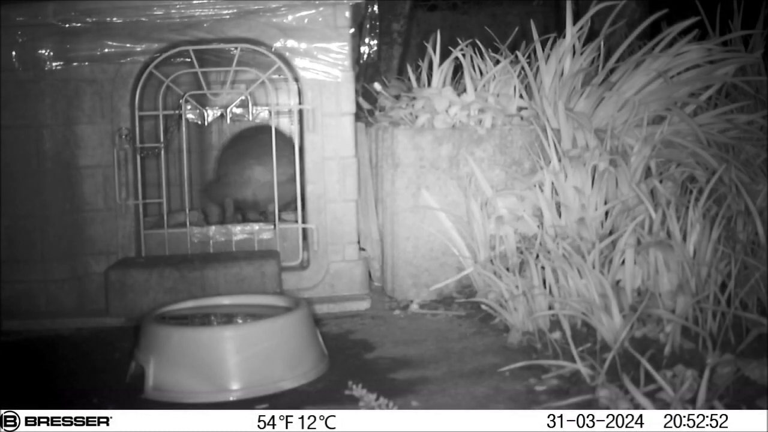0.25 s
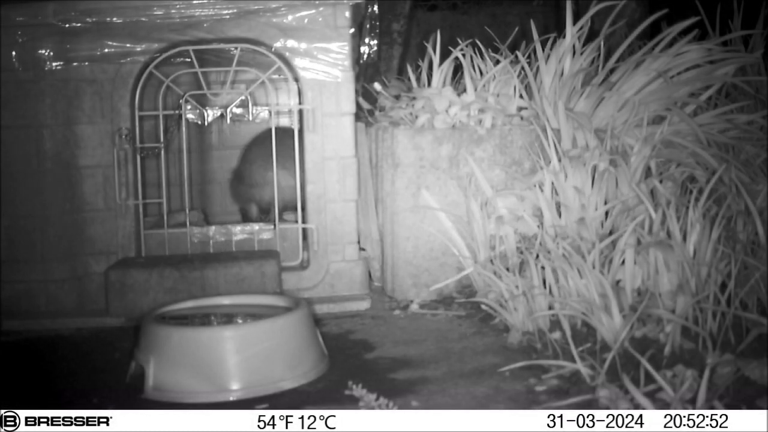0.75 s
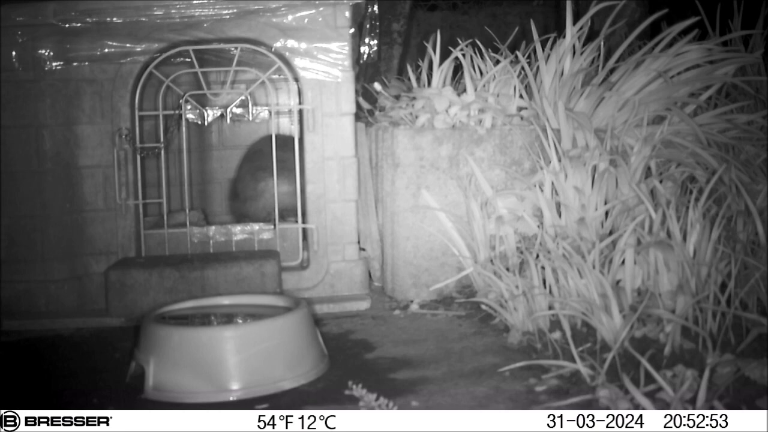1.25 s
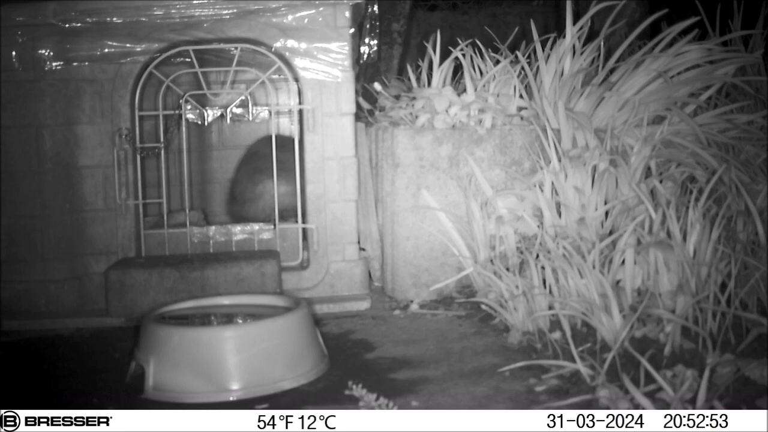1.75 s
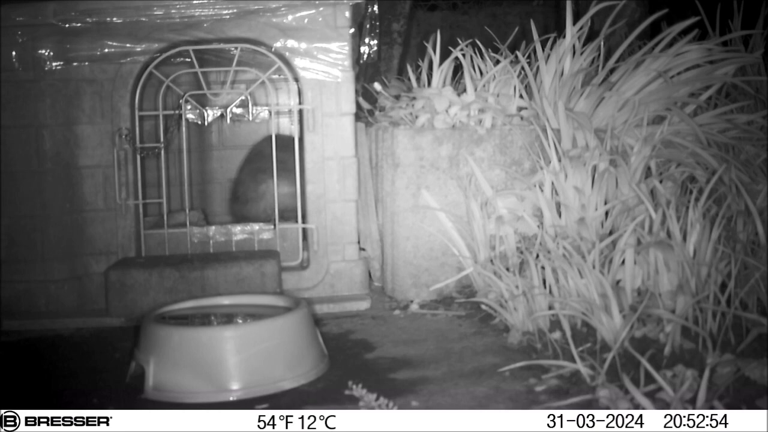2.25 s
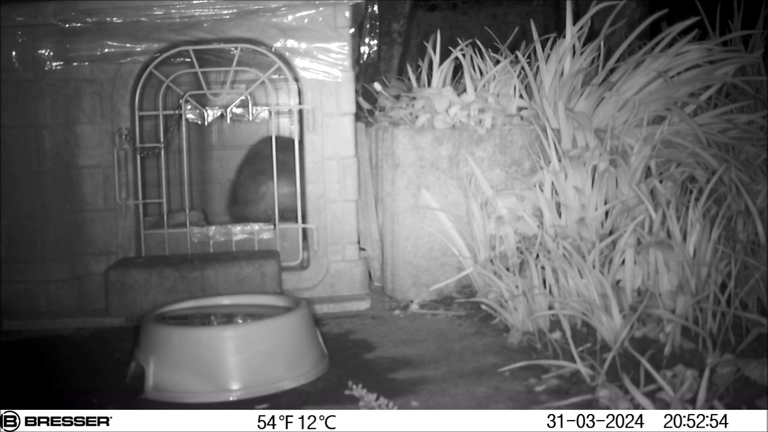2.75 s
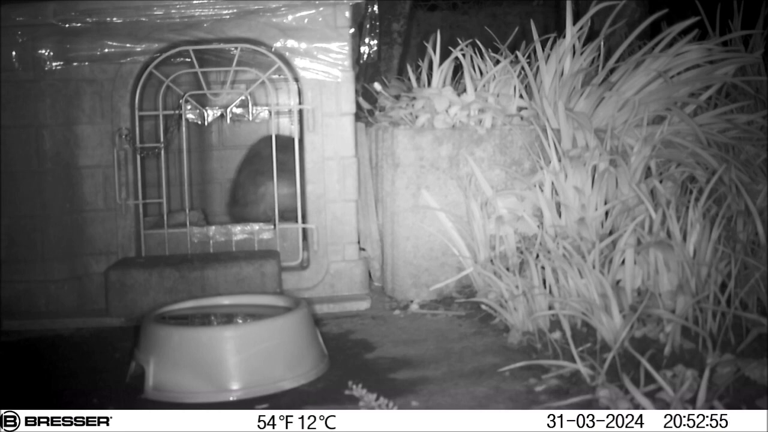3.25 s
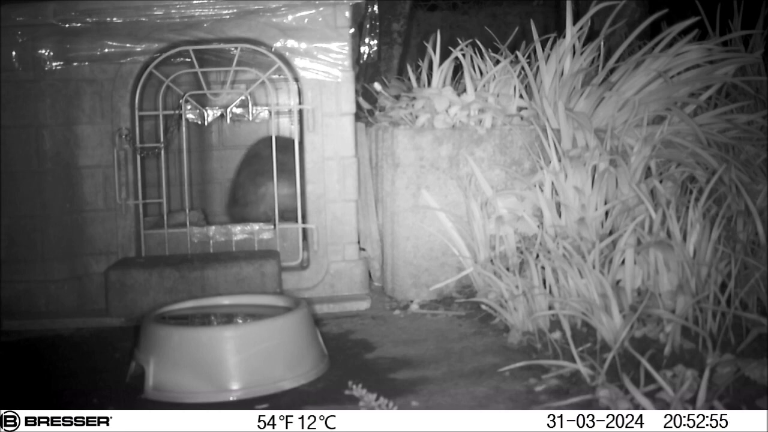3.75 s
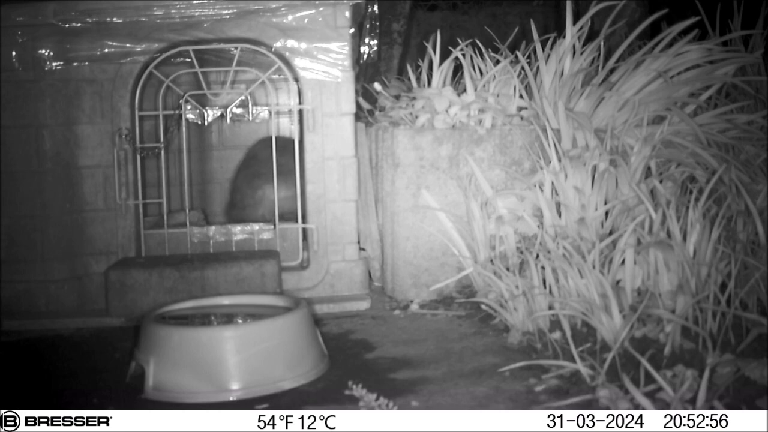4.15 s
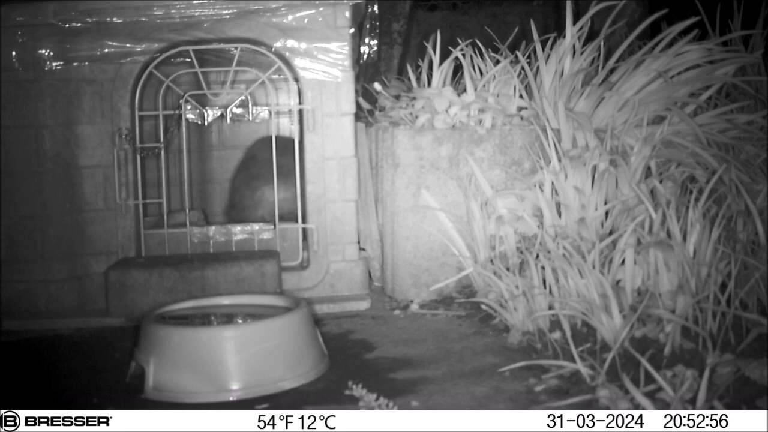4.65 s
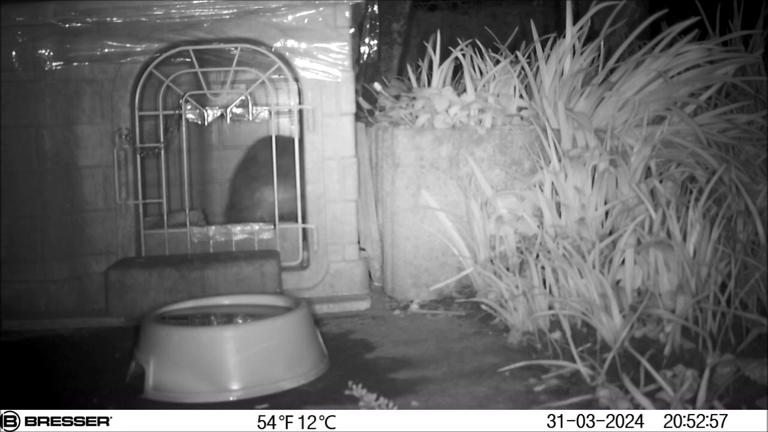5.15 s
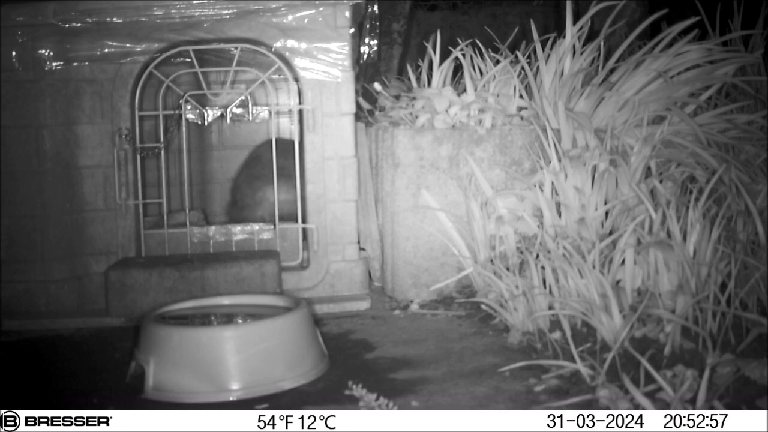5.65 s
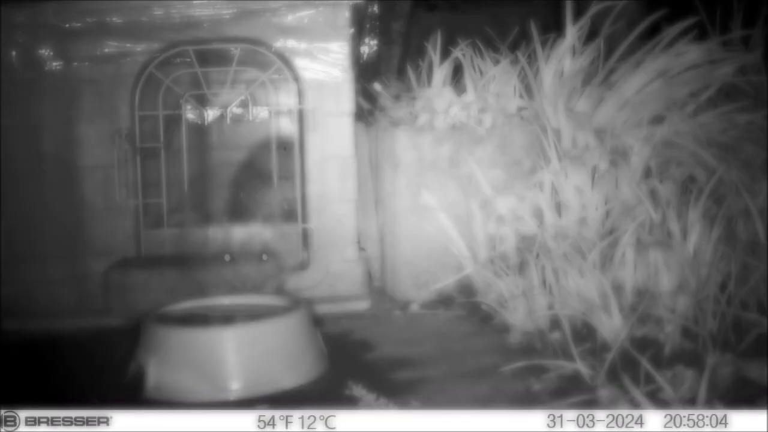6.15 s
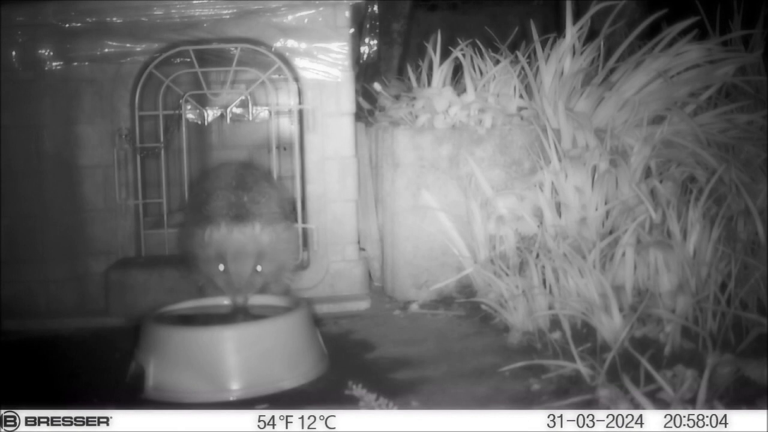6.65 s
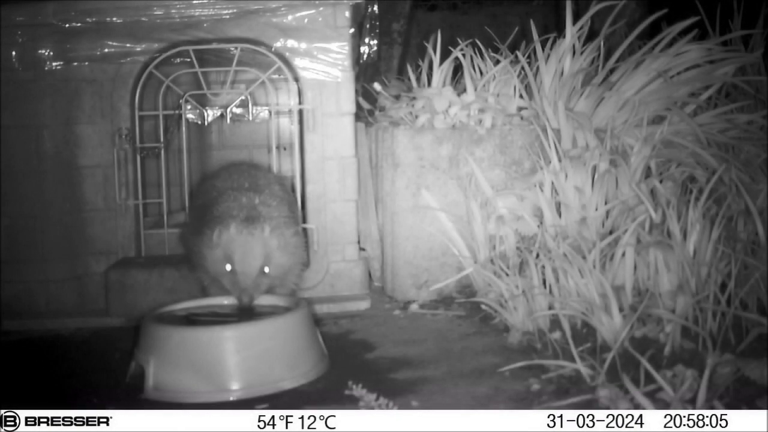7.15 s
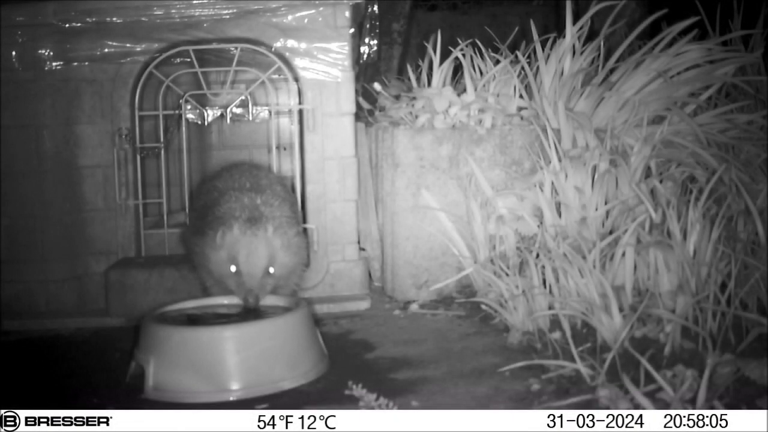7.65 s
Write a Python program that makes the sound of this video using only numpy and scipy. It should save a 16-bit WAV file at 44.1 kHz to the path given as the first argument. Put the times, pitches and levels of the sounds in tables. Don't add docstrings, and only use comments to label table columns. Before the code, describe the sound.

Small-animal chewing at night: brittle crunches and tiny ticks, later wet tongue smacks and two loud cracks on a bowl, above distant traffic rumble.

```python
import sys
import numpy as np
from scipy import signal
from scipy.fft import rfft, irfft
from scipy.io import wavfile

SR = 44100
rng = np.random.default_rng(int(sys.argv[2]) if len(sys.argv) > 2 else 0)


def dump_mix(stems):
    frames = np.atleast_2d(stems).T
    limited = np.clip(frames, -1, 1)
    pcm = np.round(limited * 32767).astype(np.int16)
    wavfile.write(sys.argv[1], SR, pcm)


def gain_from_decibels(decibels):
    exponent = np.asarray(decibels, float) / 20
    return 10 ** exponent


N = 348390

# (frequency [Hz], width [Hz], level [dB])
CAVITY_MODES = [(1665, 220, 3), (2170, 290, 1.5), (2710, 310, -0.5), (3160, 240, -3.5), (3257, 66, -3.5),
                (3500, 360, 1), (3950, 310, -2), (4200, 190, -2.5), (4620, 290, 2), (4785, 150, -3),
                (5100, 150, -4.5), (5230, 380, -5), (5650, 470, 2.5), (6240, 87, -3.5), (7230, 970, 1.5)]
# (low edge [Hz], high edge [Hz])
SPLINTER_BAND = (6340, 11800)


def chewing():
    s, rise_ms, fall_ms, *power = mouth()
    strength = swells(s, np.array(power), np.maximum(rise_ms, 0.2), np.maximum(fall_ms, 0.5))
    splinter_strength = strength[-1]

    splinters = splinter_strength * fractures(per_s=6300, uneven_db=0)
    splinters = gain_from_decibels(3.5) * filtered(splinters, 2, SPLINTER_BAND, "band")
    splinters = filtered(splinters, 2, 12500)

    sudden = np.zeros(N)
    sudden[np.round(s * SR).astype(int)] = rise_ms < 1.5
    body = ringing(strength, CAVITY_MODES, per_s=2200, uneven_db=5, blows=gain_from_decibels(20) * sudden)
    body = filtered(body, 3, 7500)

    total_strength = np.sqrt((strength ** 2).sum(axis=0))
    clicks = sudden * (gain_from_decibels(7.5) * total_strength + gain_from_decibels(26) * splinter_strength)
    return body + splinters + filtered(clicks, 3, [2500, 10500], "band")


def mouth():
    return np.hstack([snaps(), grinds(), ticks(), rustles(), smacks(), cracks()])


# (time [s], peak level [dB], fall [ms per 10 dB], mouth centre [Hz])
SNAP_BITES = [(1.8089, -61.5, 17, 4350), (2.0113, -53.5, 25, 5630), (2.4135, -61, 30, 5510),
              (2.4484, -44, 15, 5100), (2.4868, -54.5, 6, 4620), (2.665, -43.5, 20, 5540),
              (2.9728, -52, 6, 5700), (2.9955, -51.5, 9.5, 3880), (3.204, -47.5, 14, 5600),
              (3.4233, -54, 13, 5300), (3.452, -46.5, 10.5, 3500), (3.6119, -56.5, 9.3, 5730),
              (3.9673, -50.5, 12, 3520), (4.3533, -55, 23, 5540), (4.3984, -50.5, 20, 3480),
              (4.4164, -55, 27, 4680), (4.8735, -47, 12, 5300), (4.872, -53, 8, 3500),
              (4.8894, -49.5, 18, 4620), (5.0986, -56, 15, 4400), (5.358, -52.5, 9, 4670),
              (5.9072, -53, 13, 3300), (5.9657, -56, 10, 5590), (6.1935, -57.5, 14, 3200),
              (6.4136, -52.5, 21, 5600), (6.9959, -56, 28, 4320), (7.3473, -57, 10, 5100),
              (7.5247, -63.5, 34, 4500), (7.7446, -62, 15, 4390)]


def snaps():
    rise_ms, fall_ms = 5.1, column(SNAP_BITES, 2)
    return swarms_of(SNAP_BITES, rise_ms, fall_ms, muffled(SNAP_BITES, -9.5), broad_db=0.5, home_hz=4600)


# (time of the peak [s], peak level [dB], rise [ms per 10 dB], mouth centre [Hz])
GRIND_BITES = [(1.2356, -67, 18, 4570), (1.463, -57, 14, 5200), (1.8386, -56, 10, 4600),
               (2.0577, -57.5, 8, 3800), (2.6454, -62, 22, 4840), (2.6877, -52.5, 8, 3680),
               (3.1907, -60.5, 20, 5730), (3.6496, -46, 15.5, 5350), (3.9195, -61, 12, 5030),
               (4.1873, -63, 16, 5680), (4.2699, -63.5, 22, 5720), (4.3759, -54, 12, 4220),
               (4.6674, -54.5, 33, 3500), (4.845, -58, 8, 5300), (5.1173, -49.5, 22, 4540),
               (5.2471, -67.5, 62, 4380), (5.6281, -58, 24, 4400), (6.0028, -60.5, 58, 4710),
               (6.0458, -62, 20, 6060), (6.3915, -56.5, 12.5, 5750), (6.5595, -67, 15, 3610),
               (6.8491, -57, 12, 5700), (6.8889, -51.5, 13, 4000), (7.098, -50, 14, 5030),
               (7.1926, -63, 13, 3340), (7.2237, -60.5, 15, 4690), (7.3266, -59.5, 45, 3650),
               (7.5612, -67, 25, 3950)]


def grinds():
    rise_ms, fall_ms = column(GRIND_BITES, 2), 13.7
    return swarms_of(GRIND_BITES, rise_ms, fall_ms, muffled(GRIND_BITES, -10), broad_db=0, home_hz=4500)


# (time [s], peak level [dB], mouth centre [Hz])
CRUMB_TICKS = [(0.0783, -61, 3120), (1.2026, -70, 4590), (1.2434, -67, 4630), (1.7321, -62.5, 4690),
               (1.7603, -66, 4220), (2.2337, -69, 4860), (2.5845, -67, 3990), (3.154, -63, 4840),
               (3.9448, -65, 4640), (4.2162, -60, 3230), (4.224, -66, 5630), (5.0801, -57, 4900),
               (5.5509, -66, 4350), (5.5998, -66, 4620), (5.7333, -67, 4380), (5.894, -61, 4360),
               (6.2363, -64, 3390), (6.3761, -55, 5660), (6.4718, -65, 5680), (6.5246, -61, 5810),
               (6.7263, -61, 4650), (6.7729, -58, 3260), (7.1252, -63, 4890), (7.213, -65, 4770),
               (7.3596, -64, 4540), (7.4028, -68, 3990), (7.5991, -64, 4720), (7.7336, -60, 4410),
               (7.7698, -62, 3160), (7.8005, -64, 4610)]


def ticks():
    rise_ms, fall_ms = 4.5, 6.7
    return swarms_of(CRUMB_TICKS, rise_ms, fall_ms, muffled(CRUMB_TICKS, -9), broad_db=-8, home_hz=4500)


# (time [s], peak level [dB], mouth centre [Hz])
TONGUE_RUSTLES = [(0.34, -72, 6310), (1.17, -69.5, 3130), (1.265, -69, 4800), (1.3893, -71, 4680),
                  (1.5674, -68, 6000), (2.96, -67, 4810), (3.0769, -70, 4680), (4.295, -73, 4580),
                  (4.5184, -64, 5760), (4.7552, -65, 3500), (5.935, -66, 4800), (6.30, -65, 5710),
                  (7.5, -68, 4810), (7.63, -75, 3350), (7.715, -72, 3450)]


def rustles():
    rise_ms, fall_ms = 18, 30
    return swarms_of(TONGUE_RUSTLES, rise_ms, fall_ms, muffled(TONGUE_RUSTLES, -9), broad_db=-1.5, home_hz=4600)


# (time [s], peak level [dB], length [ms per 10 dB], mouth centre [Hz])
TONGUE_SMACKS = [(1.2788, -69, 21, 4740), (1.5969, -64, 1, 4810), (1.607, -59, 9, 4760),
                 (1.643, -60, 7, 4900), (4.629, -44, 5, 5700), (4.632, -51, 22, 5650),
                 (5.3242, -61, 5, 4620), (5.3392, -61, 9, 4630), (5.9374, -63, 3.5, 4760),
                 (6.4896, -56.5, 9, 4610), (6.865, -55, 5, 5600), (6.9735, -53, 3.2, 4600),
                 (6.976, -52, 8, 4300), (7.276, -52.5, 2.5, 3370), (7.6762, -67, 4.3, 4600),
                 (7.682, -53.5, 6, 4330)]


def smacks():
    fall_ms = column(TONGUE_SMACKS, 2)
    rise_ms = 0.4 * fall_ms
    return swarms_of(TONGUE_SMACKS, rise_ms, fall_ms, bright_db=-14, broad_db=-13, home_hz=4500,
                     focus_octaves=0.061)


# (time [s], peak level [dB], rise [ms per 10 dB], fall [ms per 10 dB], mouth centre [Hz])
HARD_CRACKS = [(6.0563, -45.5, .4, 7.4, 6050), (6.1294, -45, .6, 4, 3060), (6.1332, -31.5, 3.2, 3.8, 3100),
               (6.1388, -29.5, 4.7, 5.1, 4300), (6.15, -37, 5.8, 8.9, 4530), (6.161, -45, 6.8, 2.5, 4600),
               (6.5939, -28.5, 0.59, 3.6, 4100), (6.604, -31.5, 1.2, 6.4, 3700),
               (6.643, -54, 4.4, 3.5, 3500), (6.656, -48, 8.6, 7.1, 3680), (6.665, -49, 2.1, 15, 4900)]


def cracks():
    s, peak_db, rise_ms, fall_ms, _ = np.transpose(HARD_CRACKS)
    dry_db, wet_from_s = -4.5, 6.4
    wet_db = -24.5 - 0.77 * (peak_db + 29)
    bright_db = np.where(s < wet_from_s, dry_db, wet_db)
    return swarms_of(HARD_CRACKS, rise_ms, fall_ms, bright_db, broad_db=-5.5, home_hz=3300)


def muffled(rows, bright_db):
    s, peak_db, centre_hz = np.transpose(rows)[[0, 1, -1]]
    wet_db = -3 * (s > 5.88)
    closing_db = -8.5 * np.log2(centre_hz / 4500)
    depth_db = -0.4 * (np.maximum(peak_db, -58) + 51)
    return bright_db + wet_db + closing_db + depth_db


def swarms_of(rows, rise_ms, fall_ms, bright_db, broad_db, home_hz, focus_octaves=0.11):
    s, peak_db, centre_hz = np.transpose(rows)[[0, 1, -1]]
    ringing_share = shares(centre_hz, broad_db, home_hz, focus_octaves, bright_db)
    splinter_share = gain_from_decibels(bright_db + 0 * s) ** 2
    power = np.vstack([ringing_share, splinter_share]) * gain_from_decibels(peak_db) ** 2
    return np.vstack([s, rise_ms + 0 * s, fall_ms + 0 * s, power])


def shares(centre_hz, broad_db, home_hz, focus_octaves, bright_db):
    hz, width_hz, level_db = np.transpose(CAVITY_MODES)[:, :, None]
    focus = np.exp(-0.5 * (np.log2(hz / centre_hz) / focus_octaves) ** 2)
    middle_hz = np.sqrt(centre_hz * home_hz)
    broad = np.exp(-0.5 * (np.log2(hz / middle_hz) / 0.42) ** 2)
    broad = broad + gain_from_decibels(np.maximum(bright_db, -18) - 2.5) ** 2
    share = (focus + broad * gain_from_decibels(broad_db) ** 2) * gain_from_decibels(level_db) ** 2
    return share / share.sum(axis=0)


# (time [s], peak level [dB], fall [ms per 10 dB], struck spot [Hz])
DISH_KNOCKS = [
    (6.129, -39, 6, 1300),
    (6.134, -36, 5, 1600),
    (6.141, -29, 1.5, 1530),
    (6.138, -40, 8, 760),
    (6.151, -47, 3, 1700),
    (6.596, -42, 6, 1400),
    (6.606, -34, 5.0, 1050),
    (6.6483, -42, 3.2, 1100),
    (5.907, -53, 8, 2200),
]
# (frequency [Hz], width [Hz], level [dB])
DISH_MODES = [(630, 140, -6.5), (795, 270, -7.5), (1277, 200, -2), (1600, 145, 1), (1990, 120, -4)]


def knocks():
    s, peak_db, fall_ms, spot_hz = np.transpose(DISH_KNOCKS)
    hz, width_hz, level_db = np.transpose(DISH_MODES)[:, :, None]
    distance_octaves = np.abs(np.log2(hz / spot_hz))
    power = gain_from_decibels(level_db + peak_db - 6.5 - 10 * distance_octaves) ** 2
    strength = swells(s, power, 1.2 + 0 * s, np.maximum(fall_ms, 0.5))
    blows = np.zeros(N)
    blows[np.round(s * SR).astype(int)] = gain_from_decibels(15.5)
    return ringing(strength, DISH_MODES, per_s=4000, uneven_db=4.5, blows=blows)


# (time [s], peak level [dB], lowest mode [dB], second mode [dB], upper modes [dB])
GLAZE_TOUCHES = [
    (0.005, -59.5, 2.5, -6, -5),
    (0.049, -73, -2, 11, -12),
    (0.06, -72, 0.5, 11, -12),
    (0.447, -59, -12, -9, -9),
    (4.102, -53.5, -2, -6, -0.5),
]
# (frequency [Hz], level [dB], decay by 60 dB [s])
GLAZE_MODES = [(3120, 2, 0.021), (5260, -4, 0.04), (5390, 3.5, 0.031), (8000, -7, .035), (10150, -11, .03),
               (11270, -6, .03)]


def pings():
    out = np.zeros(N)
    for k, (hz, level_db, t60) in enumerate(GLAZE_MODES):
        clicks = np.full(N, 1e-18)
        for s, peak_db, low_db, second_db, upper_db in GLAZE_TOUCHES:
            touch_db = (low_db, second_db, 0, upper_db)[min(k, 3)]
            gain = gain_from_decibels(peak_db + level_db + touch_db)
            clicks[round(s * SR)] += gain
            clicks[round((s + 0.0055) * SR)] += gain * gain_from_decibels(-4.5)
        decay = gain_from_decibels(-60 / (t60 * SR))
        turn = 2 * np.pi * hz / SR
        out += signal.lfilter([0, np.sin(turn)], [1, -2 * decay * np.cos(turn), decay ** 2], clicks)
    return out


# (delay [ms], level [dB])
HOUSE_ECHOES = [(2.3, -11), (4.1, -10), (6.7, -14), (10.5, -15.5)]


def house(x):
    out = x.copy()
    for ms, level_db in HOUSE_ECHOES:
        lag = round(ms * SR / 1000)
        out[lag:] += gain_from_decibels(level_db) * x[:-lag]
    return out


# (time [s], rumble level [dB], hiss level [dB])
NIGHT_LEVELS = [
    (0, -51.5, -65.5),
    (2.9, -52, -65.5),
    (5.88, -52, -65),
    (5.91, -49, -61.5),
    (6.7, -49, -61.5),
    (7.38, -50.5, -62),
    (7.41, -53, -63.5),
    (7.9, -53.5, -65.5),
]
# (frequency [Hz], level [dB per Hz])
TRAFFIC_SPECTRUM = [(11, -52), (18, -4.5), (43, -1), (97, -4.5), (156, -9.5), (297, -20), (325, -24.5),
                    (362, -21.5), (463, -37.5), (700, -33.5), (910, -34), (1540, -120)]
# (frequency [Hz], level [dB per Hz])
HISS_SPECTRUM = [(210, -17), (350, -2.5), (620, -6), (1000, -8.5), (1600, -7.5), (2500, -13), (3500, -15),
                 (5000, -16), (7000, -21), (8500, -18), (10500, -19), (11700, -20), (13600, -23.5),
                 (14800, -20.5)]
# (frequency [Hz], width [Hz], boost [dB])
WHINE_BANDS = [(9080, 590, 6.8), (12300, 500, 6.5)]


def night():
    s, rumble_db, hiss_db = np.transpose(NIGHT_LEVELS)
    t = np.arange(N) / SR
    rumble = coloured(TRAFFIC_SPECTRUM)
    hiss = coloured(HISS_SPECTRUM)
    for hz, width_hz, boost_db in WHINE_BANDS:
        whine = resonate(resonate(hiss, hz, width_hz), hz, width_hz)
        hiss = hiss + (gain_from_decibels(boost_db) - 1) * whine
    return gain_from_decibels(np.interp(t, s, rumble_db)) * rumble + gain_from_decibels(np.interp(t, s, hiss_db)) * hiss


def fractures(per_s, uneven_db):
    born = rng.random(N) < per_s / SR
    size = gain_from_decibels(uneven_db * np.minimum(rng.exponential(1, N), 4))
    return rms_one(born * size * rng.choice([-1, 1], N))


def swells(at_s, power, rise_ms, fall_ms):
    out = np.full((len(power), N), 1e-24)
    for k, (s, rise, fall) in enumerate(zip(at_s, rise_ms, fall_ms)):
        start = max(round((s - rise / 200) * SR), 0)
        stop = min(round((s + fall / 200) * SR), N)
        i = np.arange(start, stop)
        ms = (i / SR - s) * 1000
        out[:, i] += power[:, k:k + 1] * 10 ** np.where(ms < 0, ms / rise, -ms / fall)
    return np.sqrt(out)


def ringing(strength, modes, per_s, uneven_db, blows=0):
    shared = blows + gain_from_decibels(-8) * fractures(900, uneven_db)
    swarms = [gain_from_decibels(-1) * fractures(per_s, uneven_db) for _ in range(3)]
    out = 0
    for k, (hz, width_hz, _) in enumerate(modes):
        struck = strength[k] * (swarms[k % 3] + shared * rng.choice([-1, 1]))
        wide_hz = 1.6 * width_hz
        rung = resonate(resonate(struck, hz, wide_hz), hz, wide_hz)
        out = out + rung * np.sqrt(2 * SR / (np.pi * wide_hz))
    return out


def resonate(x, hz, width_hz):
    r = np.exp(-np.pi * width_hz / SR)
    feedback = [1, -2 * r * np.cos(2 * np.pi * hz / SR), r * r]
    return signal.lfilter([(1 - r * r) / 2, 0, (r * r - 1) / 2], feedback, x)


def filtered(x, order, hz, kind="low"):
    return signal.sosfilt(signal.butter(order, hz, kind, fs=SR, output="sos"), x)


def coloured(spectrum):
    hz, level_db = np.transpose(spectrum)
    grid_hz = np.arange(N // 2 + 1) * SR / N + 1e-3
    shape = gain_from_decibels(np.interp(np.log(grid_hz), np.log(hz), level_db, left=-99))
    return rms_one(irfft(rfft(rng.standard_normal(N)) * shape, N))


def rms_one(x):
    return x / np.sqrt(np.mean(x ** 2) + 1e-20)


def column(rows, k):
    return np.transpose(rows)[k]


def scene():
    animal = chewing() + knocks() + pings()
    return (house(animal) + night())[None]


def low_pass(x):
    return signal.sosfilt(signal.butter(12, 15730, fs=SR, output="sos"), x)


def record(dry):
    steep = signal.ellip(12, 0.3, 60, 15720, fs=SR, output="sos")
    mix = signal.sosfilt(steep, dry)
    return low_pass(mix)


dry = scene()
out = record(dry)
dump_mix(out)
```